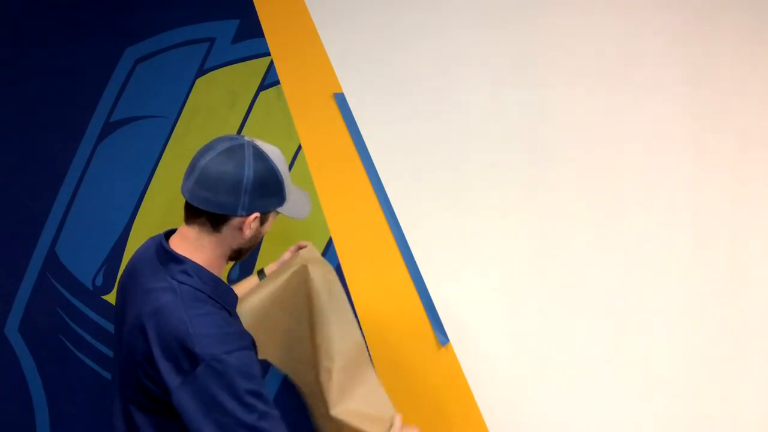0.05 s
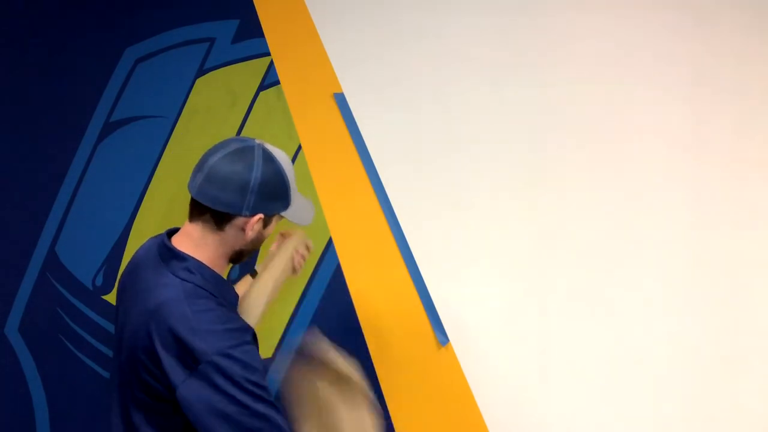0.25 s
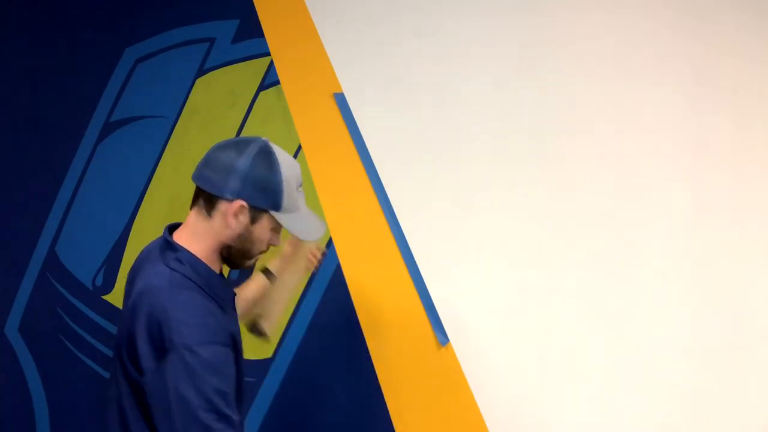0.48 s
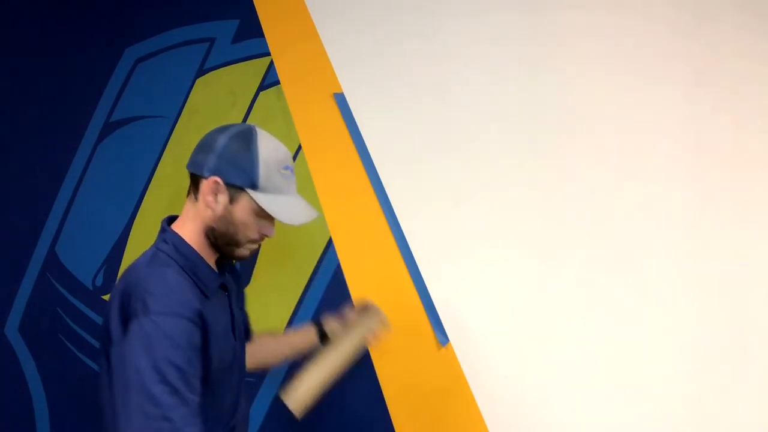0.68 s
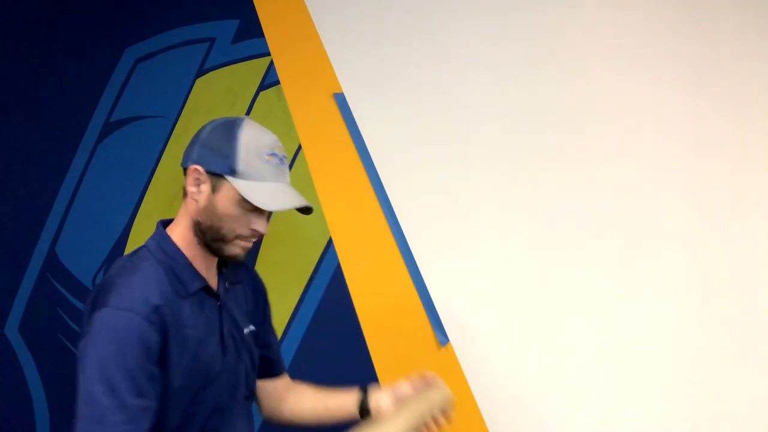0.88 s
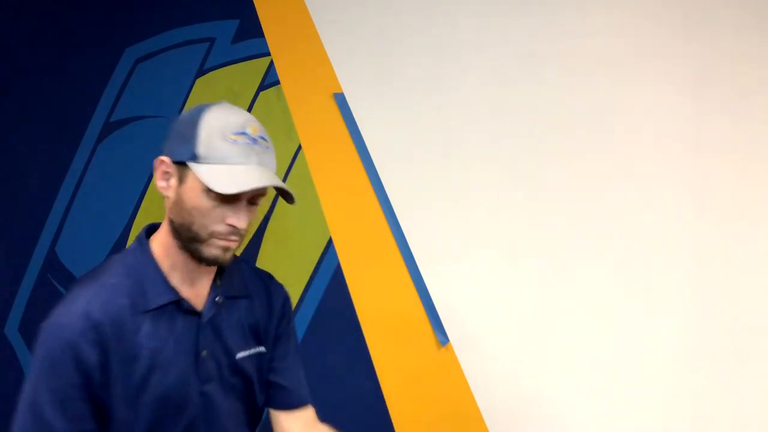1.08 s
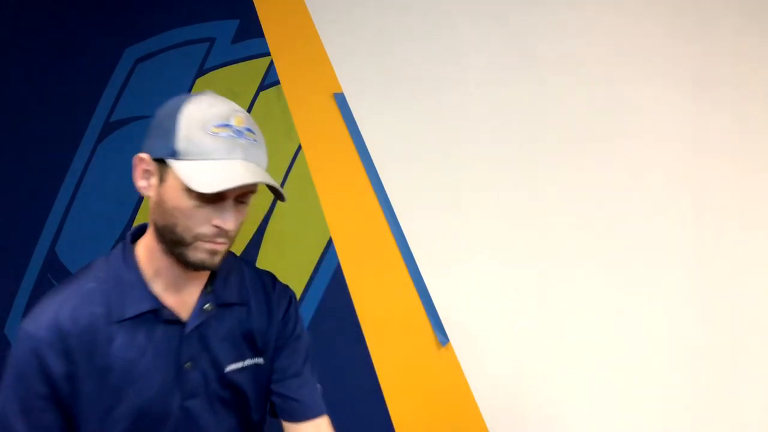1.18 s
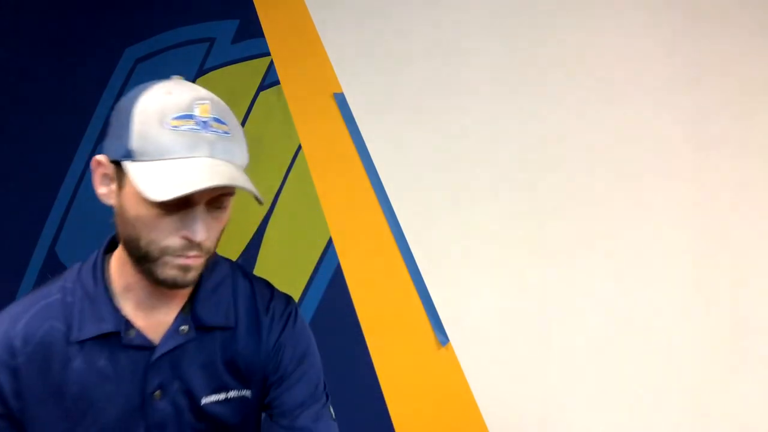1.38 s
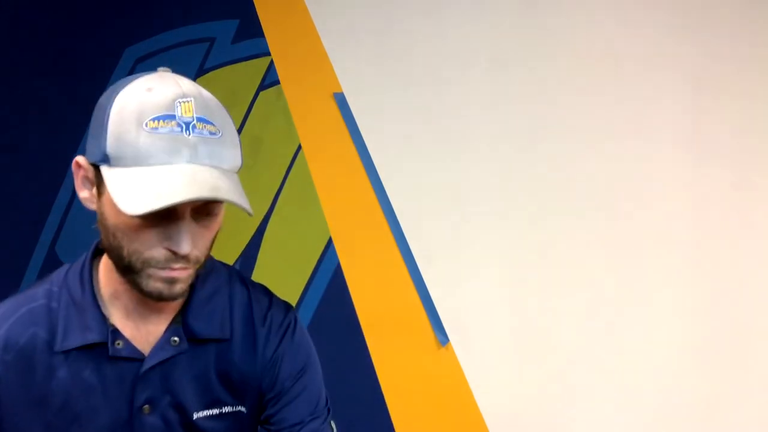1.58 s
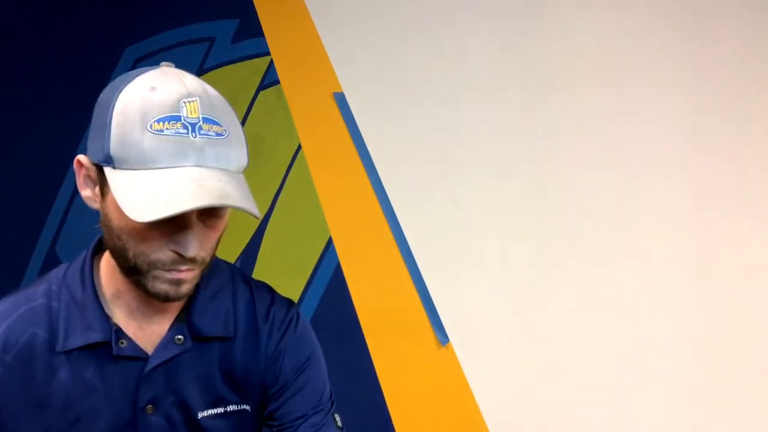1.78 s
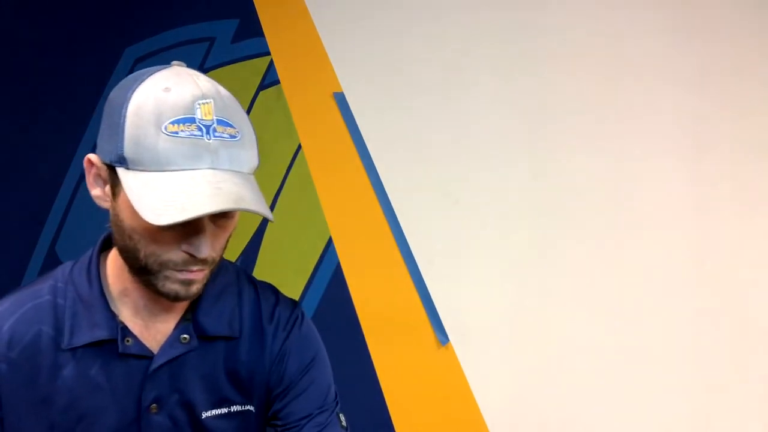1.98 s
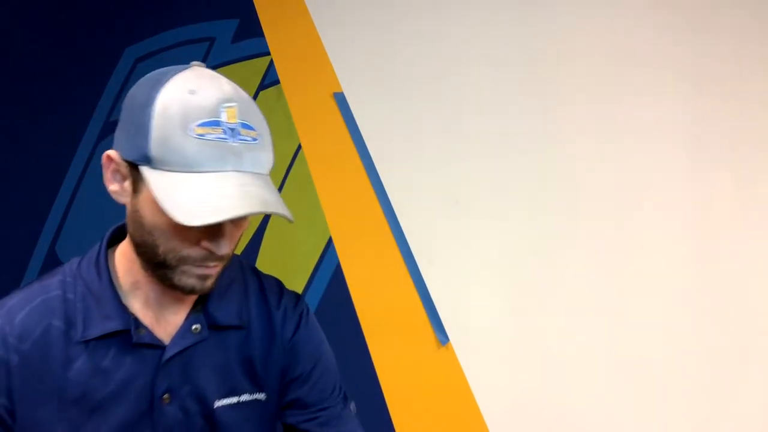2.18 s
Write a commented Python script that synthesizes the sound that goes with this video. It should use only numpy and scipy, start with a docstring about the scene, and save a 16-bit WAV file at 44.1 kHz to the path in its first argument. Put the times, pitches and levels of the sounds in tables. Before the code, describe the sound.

A sheet of heavy paper crackles and rips off a roll in one fast stroke, rustles faintly, then the roll lands with a hollow knock close to the microphone, in a bare, reverberant room.

```python
"""In a bare room, a sheet of masking paper is pulled from a hand-held roll and ripped off in one quick stroke.
The loose sheet rustles and crackles; the roll is set down with a hollow knock near the microphone; a click ends it.
Paper sounds are trains or bursts of random grains shaped in level and spectrum; the knock is a set of blows
exciting decaying modes and a filtered-noise thud. Diffuse reverberation and steady air noise surround them.
"""
import sys
import numpy as np
from scipy import signal
from scipy.io import wavfile
from scipy.ndimage import uniform_filter1d

SR = 44100
rng = np.random.default_rng(int(sys.argv[2]) if len(sys.argv) > 2 else 0)


def bounce(signal):
    """Save signal as a 16-bit WAV file at the path given by the first command-line argument."""
    frames = np.transpose(np.atleast_2d(signal))
    limited = np.clip(frames, -1, 1)
    pcm = np.round(limited * 32767).astype(np.int16)
    wavfile.write(sys.argv[1], SR, pcm)


N = 97020
TIME = np.arange(N) / SR


def amp(db):
    """Decibel definition: an amplitude ratio grows tenfold every 20 dB."""
    return 10 ** (np.asarray(db) / 20)


def read(points, hz):
    """Logarithmic frequency scale: interpolates a table evenly in pitch."""
    f, value = np.transpose(points)
    return np.interp(np.log(hz + 1), np.log(f), value)


def unit(x):
    """Power normalisation: scales a signal to an rms of 1."""
    return x / np.sqrt(np.mean(x ** 2) + 1e-20)


def level(points):
    """Amplitude envelope: gain over time from (s, dB) points, practically silent outside them."""
    s, db = np.transpose(points)
    return amp(np.interp(TIME, s, db, left=-140, right=-140))


def add(mix, s, sound):
    """Superposition: sums a sound into the mix, in place, from a given second."""
    part = mix[max(round(s * SR), 0):][:len(sound)]
    part += sound[:len(part)]


def colour(x, points, tilt_db=0):
    """Minimum-phase filtering: a causal response of unit energy with the given spectral shape."""
    hz = abs(np.fft.fftfreq(4096, 1 / SR))
    gain_db = read(points, hz) + tilt_db * np.log2(1 + hz / 1000)
    log_gain = np.log(amp(gain_db))
    # the phase of a minimum-phase filter follows from its log gain by the Hilbert transform
    response = np.exp(np.conj(signal.hilbert(log_gain)))
    taps = np.fft.ifft(response).real
    return signal.fftconvolve(x, taps / np.linalg.norm(taps))[:len(x)]


def snaps(per_s, spread_db):
    """Shot noise: clicks of random time and sign, a few much stronger than the rest, at rms 1."""
    size = amp(spread_db * np.minimum(rng.exponential(1, N), 4))
    sign = rng.choice([-1., 1.], N)
    occurs = rng.random(N) < per_s / SR
    return unit(size * sign * occurs)


def rip():
    """Fracture as shot noise: fibres snap in a dense run as the tear speeds across the sheet."""
    # spectrum of the tearing: frequency_hz, relative_db_per_hz
    rip_colour = [(35, -63.5), (60, -26), (175, -19.5), (216, -3), (261, -18.5), (329, -12), (361, -25.5),
                  (501, -8), (563, -14), (985, -7.5), (2180, -6), (4380, 0.5), (11100, -7.5), (15800, -15)]
    start_s, full_s, end_s, release_s = 0.21, 0.2318, 0.32, 0.061
    full_speed_db, catch_db, catch_s = -12.5, 1.9, 0.006
    # stroke points: time in s, level in dB relative to full speed
    stroke = level([(start_s, -19.5), (full_s, 0), (end_s, -6.5), (end_s + release_s, -24)])
    # the tear catches and runs: a smoothed random level with an rms swing of catch_db
    wander = uniform_filter1d(rng.standard_normal(N), round(catch_s * SR))
    catching = amp(catch_db * unit(wander))
    fibres = snaps(per_s=9000, spread_db=1.5)
    return amp(full_speed_db) * colour(stroke * catching * fibres, rip_colour)


def pull():
    """Friction noise: paper scrapes off the roll in fine grains."""
    # paper sliding off the roll: time_s, level_db
    pull_level = [(0, -28.5), (.02, -40.5), (.04, -40.5), (.08, -45), (.125, -54.5), (.15, -41),
                  (.175, -40), (.21, -56.5)]
    # spectrum of the scraping: frequency_hz, relative_db_per_hz
    pull_colour = [(60, -27), (184, -19), (300, -2.5), (550, -1.5), (700, -4), (1200, -2.5), (1700, 5.5),
                   (2100, -2), (3700, 1), (7000, -3.5), (9000, -10), (12000, -16), (15800, -20)]
    grains = snaps(per_s=2500, spread_db=3)
    return colour(level(pull_level) * grains, pull_colour)


def rustle():
    """Friction noise: the loose sheet and sleeves rub in soft, duller grains."""
    # loose sheet and sleeves rustling: time_s, level_db
    rustle_level = [(.4, -35), (.52, -45.5), (.62, -45.5), (.69, -53), (.76, -51.5), (.83, -60.5),
                    (.9, -52.5), (.97, -44), (1.03, -52), (1.07, -49.5), (1.14, -51), (1.2, -57),
                    (1.255, -52), (1.29, -46), (1.38, -54.5), (1.43, -56.5), (1.5, -60.5), (1.56, -48.5),
                    (1.68, -53.5), (1.78, -67), (1.82, -49), (1.89, -62.5), (1.93, -48), (1.97, -64.5),
                    (2.02, -68)]
    # spectrum of the rustling: frequency_hz, relative_db_per_hz
    rustle_colour = [(60, -37.5), (110, -10), (170, -23), (215, -6), (330, -6), (500, -9), (700, -7.5),
                     (950, -1), (1750, -0.5), (2300, -5), (4000, -2.5), (5400, -11.5), (7600, -13),
                     (8600, -23.5), (11000, -25.5), (12500, -29), (15800, -32.5)]
    grains = snaps(per_s=2200, spread_db=3)
    return colour(level(rustle_level) * grains, rustle_colour)


def crackles():
    """Exponentially decaying short bursts of noise: paper creases crackling, and a last click at the end."""
    # crackles and the last click: start_s, relative_level_db, treble_tilt_db_per_octave, decay_ms (to 1/e)
    bursts = [(.013, -16.5, 2, 4), (0.0518, -11, 1, 3.5), (0.104, -25.5, -10.5, 9),
              (0.111, -15.5, 5.5, 6.8), (.543, -22.5, 5, 15), (0.7107, -22, -1, 14), (1.0108, -28.5, -5, 3),
              (1.0529, -26, -4, 10), (1.109, -34.5, 2, 20), (1.4077, -28, 0.5, 24),
              (1.5222, -34.5, 0.5, 2.8), (1.5903, -20.5, 2, 6.1), (1.599, -18.5, -3, 14),
              (1.613, -24, -0.5, 10), (1.639, -24, -4.5, 20), (1.8100, -26.5, -6.5, 8.9),
              (1.9137, -33.5, -5, 20), (2.1293, -30.5, 1, 73)]
    # spectrum before the tilt: frequency_hz, relative_db_per_hz
    crackle_colour = [(60, -24), (250, -10), (700, -10), (1200, -3), (1700, -1.5), (2300, -4.5),
                      (3800, -1.5), (7400, -6), (8600, -13), (11000, -13.5), (12500, -18.5), (15800, -19)]
    overall_db = -30
    out, t = np.zeros(N), TIME[:SR // 5]
    for s, db, tilt_db, decay_ms in bursts:
        burst = rng.standard_normal(len(t)) * np.exp(-t / (decay_ms / 1000))
        add(out, s, amp(db + overall_db) * colour(unit(burst), crackle_colour, tilt_db))
    return out


def blow_force():
    """Contact mechanics: each blow is a smooth push, and a longer contact sounds duller."""
    # the roll landing: start_s, impulse_db, contact_ms (the push peaks at a quarter of it)
    blows = [(1.585, -4, 3.64), (1.5921, -5.5, 1.53), (1.602, -16.5, 1.4), (1.6108, -5, 0.4),
             (1.6146, -16.5, 0.23), (1.619, -18.5, 1.7), (1.650, -15, 2.4), (1.666, -17.5, 2.1),
             (1.693, -23.5, 1.5)]
    force, t = np.zeros(N), TIME[:SR]
    for s, db, contact_ms in blows:
        u = t / (contact_ms / 4000)
        push = u * np.exp(-u)
        add(force, s, amp(db) * push / push.sum())
    return force


def knock():
    """Modal synthesis: the landing roll's blows excite damped sine modes over a dense noise thud."""
    # modes of the surface and roll: frequency_hz, relative_level_db, t60_s
    modes = [(90, -14, 0.12), (119.4, -16.5, .2), (167.5, -11, 0.049), (223.1, -20, 0.28),
             (249, -3.5, 0.041), (268, -23.5, 0.36), (294, -16, .55), (331, -27.5, .55),
             (377.6, -6.5, 0.067), (470, -12, 0.031), (533, 4, 0.038), (638, -8.5, 0.11), (761, -22, .28),
             (945, -5, 0.055), (995, 8.5, 0.028), (1133, -15.5, 0.057), (1242, 0, 0.028)]
    # spectrum of the thud: frequency_hz, relative_db_per_hz
    thud_colour = [(30, -50), (80, -2.5), (200, 14), (500, 9.5), (780, -16.5), (950, 10.5), (1300, -12.5),
                   (1800, -39), (4000, -53.5)]
    thud_db, thud_t60_s, rise_s = -6.5, 0.097, 0.001
    low_hz, high_hz = 61, 1460
    t = TIME[:SR]
    ring = sum(amp(db - 60 * t / t60) * np.sin(2 * np.pi * hz * t) for hz, db, t60 in modes)
    thud = colour(rng.standard_normal(SR) * amp(-60 * t / thud_t60_s), thud_colour)
    # the surface takes a moment to start moving
    body = (ring + amp(thud_db) * thud) * (1 - np.exp(-t / rise_s))
    struck = signal.fftconvolve(blow_force(), body)[:N]
    highpass = signal.butter(5, low_hz, "high", fs=SR, output="sos")
    lowpass = signal.butter(6, high_hz, fs=SR, output="sos")
    return signal.sosfilt(np.vstack([highpass, lowpass]), struck)


def room(x, count=8):
    """Diffuse-field decay: independent noise tails take turns, so the reverberation stays smooth and untuned."""
    # reverberation time: frequency_hz, t60_s
    decay_times = [(100, 0.46), (300, 0.55), (1000, 0.57), (2500, .68), (5000, .6), (8000, 0.54),
                   (11000, 0.35), (16000, 0.35)]
    delay_s, turn_s = 0.0037, 0.008
    hz, t, bins = signal.stft(rng.standard_normal((count, SR)), SR, nperseg=256)
    decay = amp(-60 * t / read(decay_times, hz)[:, None])
    tails = signal.istft(bins * decay, SR, nperseg=256)[1]
    # tails are silent up to delay_s, then fade in over the same time
    tails = tails * np.clip(np.arange(tails.shape[1]) / SR / delay_s - 1, 0, 1)
    out = np.zeros(N)
    for k, tail in enumerate(tails):
        # a new tail every turn_s, with equal-power crossfades of the input
        away = abs((TIME / turn_s - k) % count - count / 2)
        share = np.cos(np.pi / 2 * np.minimum(away, 1))
        out += signal.fftconvolve(x * share, unit(tail) / np.sqrt(len(tail)))[:N]
    return out


def room_air():
    """Stationary noise: the room's air as steady, mostly low-pitched filtered noise."""
    # spectrum of the air: frequency_hz, relative_db_per_hz
    air_colour = [(20, -21), (40, -14.5), (62, 11.5), (120, 4.5), (250, 3.5), (500, -4), (1200, -1.5),
                  (3000, -34), (8000, -13), (16000, -28)]
    # one extra second ahead lets the filter settle before the scene starts
    return amp(-62) * colour(rng.standard_normal(N + SR), air_colour)[SR:]


def scene():
    """Direct-to-reverberant ratio places the paper far and the knock near; two identical channels."""
    # spectral shaping of the knock's reverberation: frequency_hz, relative_db_per_hz
    knock_room_colour = [(40, -14), (100, -6.5), (200, 3.5), (310, 1.5), (450, -16.5), (700, -3.5),
                         (1000, -9), (1500, 1.5), (4000, -5), (16000, -27.5)]
    paper_wet_db, crackle_wet_db, knock_wet_db = -1, 0, -17
    paper = rip() + pull() + rustle()
    crackle = crackles()
    blow = knock()
    paper_wet = room(amp(paper_wet_db) * paper + amp(crackle_wet_db) * crackle)
    knock_wet = amp(knock_wet_db) * colour(room(blow), knock_room_colour)
    return np.tile(paper + crackle + blow + paper_wet + knock_wet + room_air(), (2, 1))


def record(dry):
    """Soft limiting keeps the loudest peaks below full scale, then a lowpass ends the treble near 16 kHz."""
    knee, ceiling, edge_hz = 0.65, 0.88, 15900
    held = np.clip(dry, -knee, knee)
    limited = held + (ceiling - knee) * np.tanh((dry - held) / (ceiling - knee))
    lowpass = signal.firwin(511, edge_hz, window=("kaiser", 9), fs=SR)
    return signal.oaconvolve(limited, lowpass[None], "same")


dry = scene()
out = record(dry)
bounce(out)
```